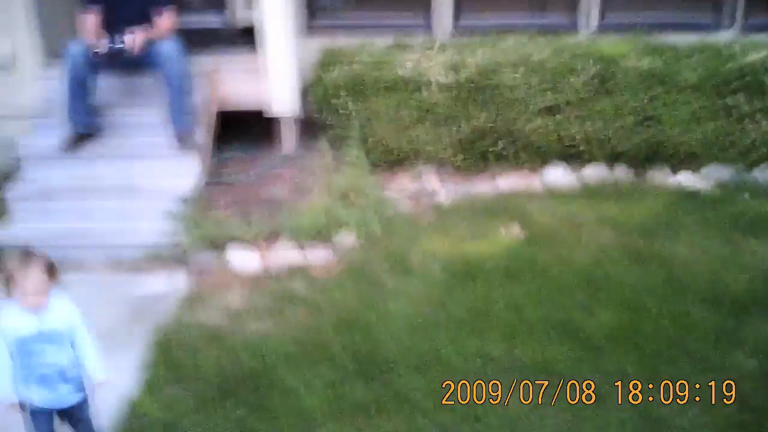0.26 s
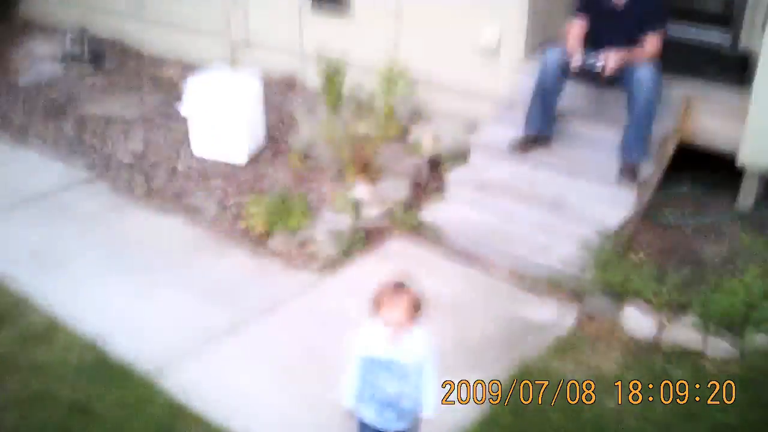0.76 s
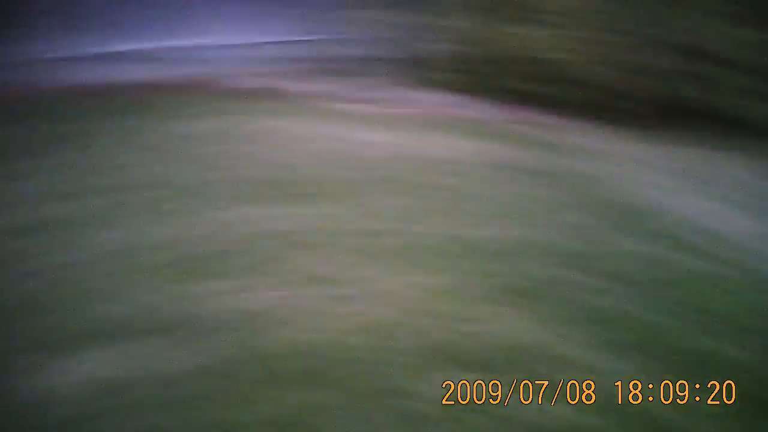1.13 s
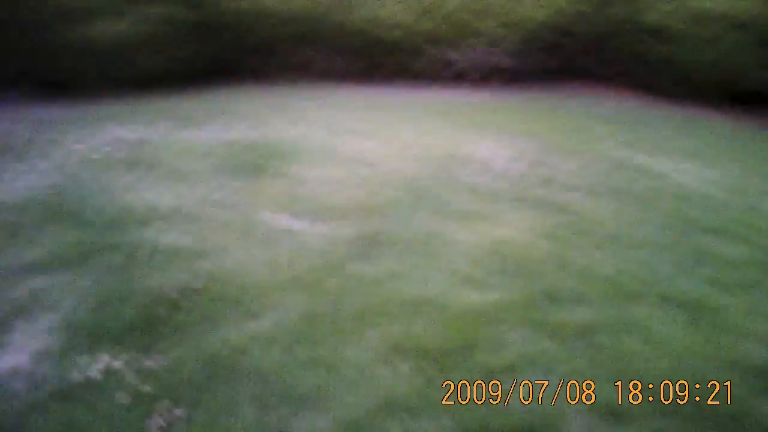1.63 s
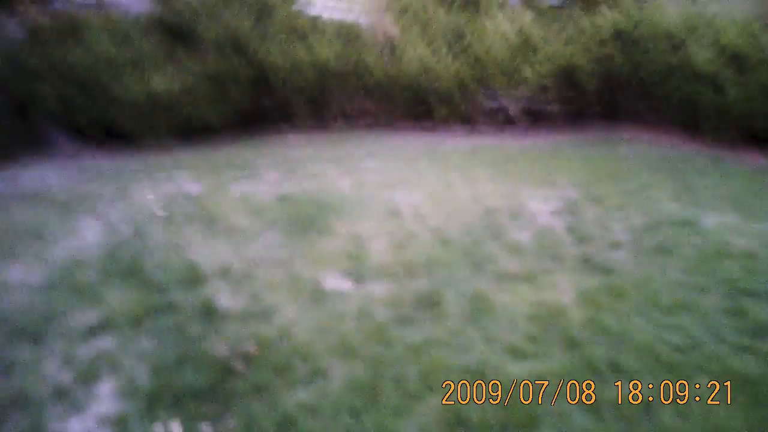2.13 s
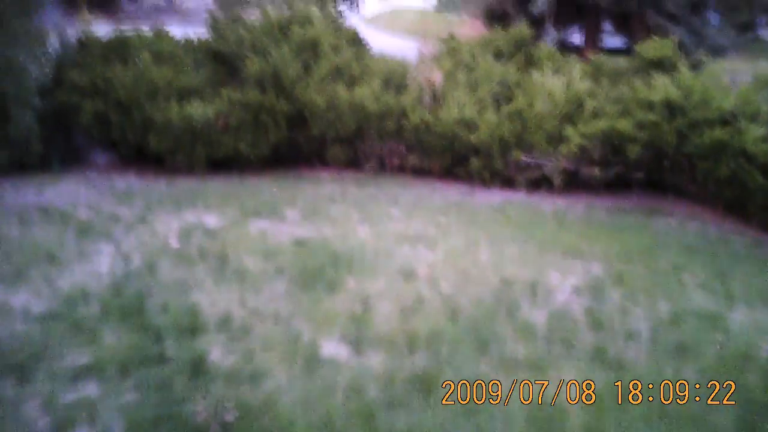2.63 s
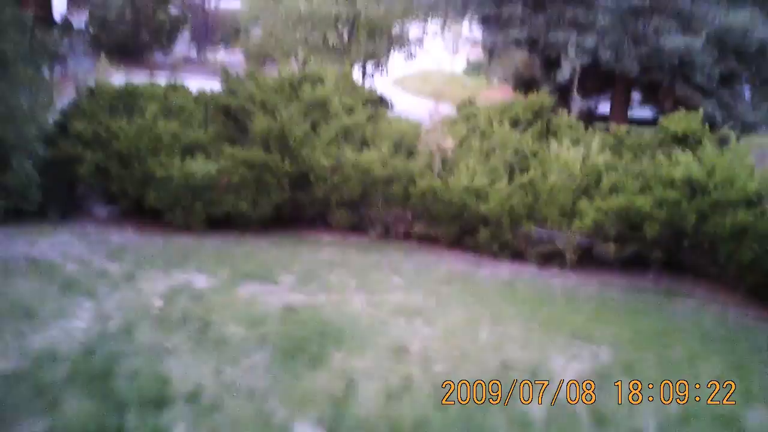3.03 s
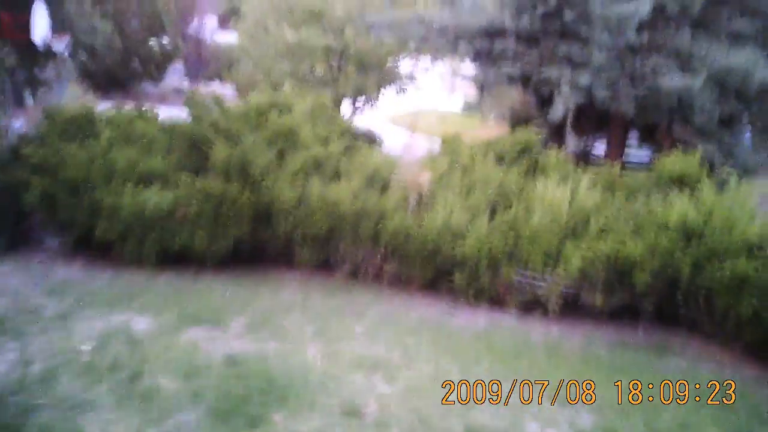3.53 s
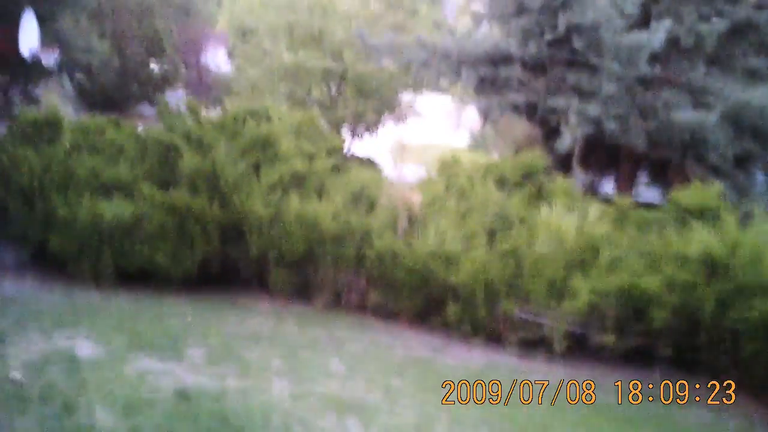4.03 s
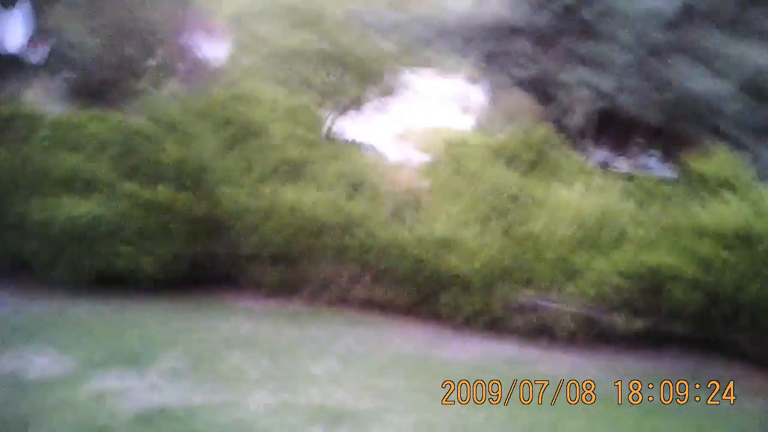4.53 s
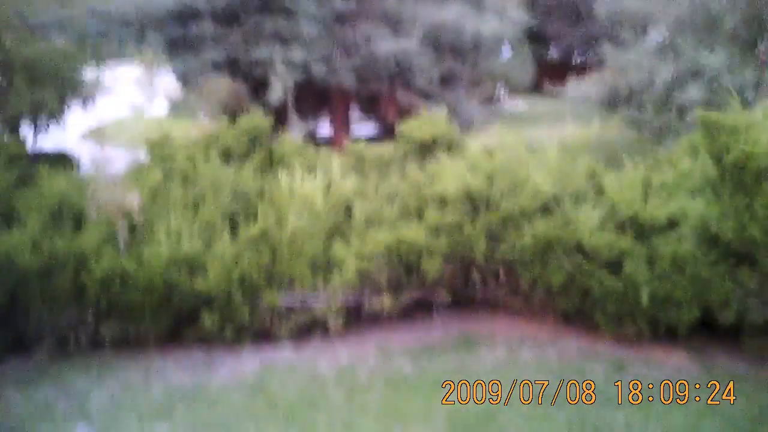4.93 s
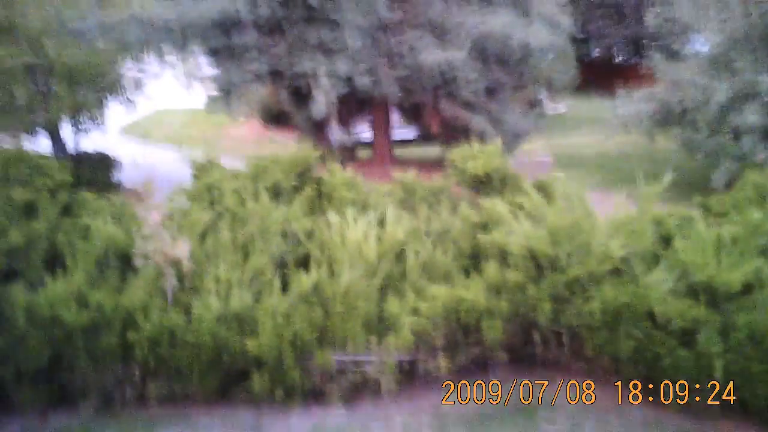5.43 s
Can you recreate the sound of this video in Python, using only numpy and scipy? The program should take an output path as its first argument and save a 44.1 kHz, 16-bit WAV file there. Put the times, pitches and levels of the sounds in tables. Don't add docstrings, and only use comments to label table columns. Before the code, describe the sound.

A microphone on a small electric helicopter catches two high gear whines beating against each other, over a rapid blade throb and hissing downwash. One whine races up near one second and rings, then both sag and buzz harshly, before speeding up again with a few air pops. Very close, dry and distorted.

```python
import sys
import numpy as np
from scipy import signal
from scipy.fft import rfft, irfft
from scipy.io import wavfile
from scipy.ndimage import uniform_filter1d

SR = 44100
rng = np.random.default_rng(int(sys.argv[2]) if len(sys.argv) > 2 else 0)


def volts_from_db(level):
    exponent = np.asarray(level, float) / 20
    return 10 ** exponent


def persist_wave(psi):
    counts = np.round(np.clip(psi, -1, 1) * 32767).astype(np.int16)
    wavfile.write(sys.argv[1], SR, np.atleast_2d(counts).T)


N = 250047
TIME_S = np.arange(N) / SR
WHEEL_TEETH, PINION_TEETH = 92, 10
CRUISE_HZ = 2500


def in_time(rows):
    s, *columns = np.transpose(rows)
    return [np.interp(TIME_S, s, column) for column in columns]


def rms_one(x):
    return x / np.sqrt(np.mean(np.abs(x) ** 2) + 1e-20)


def wander(width_hz):
    r = np.exp(-2 * np.pi * width_hz / SR)
    white = rng.standard_normal(N) + 1j * rng.standard_normal(N)
    return rms_one(signal.lfilter([1], [1, -2 * r, r * r], white))


def line(turns):
    return np.sqrt(2) * np.exp(2j * np.pi * turns)


def resonance(hz, centre_hz, width_hz):
    return 1 / (1 + (2 * (hz - centre_hz) / width_hz) ** 2)


def coloured(points, modes=()):
    hz = np.maximum(np.arange(N // 2 + 1) * SR / N, 10)
    points_hz, points_db = np.transpose(points)
    level_db = np.interp(np.log(hz), np.log(points_hz), points_db)
    for mode_hz, width_hz, bump_db in modes:
        level_db += bump_db * resonance(hz, mode_hz, width_hz)
    return rms_one(irfft(rfft(rng.standard_normal(N)) * volts_from_db(level_db), N))


# pitch in Hz, level in dB.
SWITCHING = [
    (1960.5, -41),
    (3921, -58.5),
]


def chopper():
    return sum(volts_from_db(db) * (line(hz * TIME_S) * (1 + 0.91 * wander(20.0))).real for hz, db in SWITCHING)


# centre in seconds, swell in dB, half length in seconds.
AIR_GUSTS = [
    (0.515, 5, .05),
    (0.933, 6, 0.083),
    (1.8, -4, .5),
    (2.818, 4.5, 0.04),
    (3.15, 2.5, 0.16),
    (4.2, 3.5, 0.22),
    (4.687, 6.5, 0.12),
]


def gust():
    breeze_db = -37.5
    colour = [(20, -7.5), (45, 2.5), (90, -1.5), (200, -6.5), (400, -16.0), (900, -24.0), (20000, -90)]
    swell_db = sum(db * np.exp(-((TIME_S - s) / half_s) ** 2) for s, db, half_s in AIR_GUSTS)
    flutter_db = 2.6 * wander(20.0).real
    return volts_from_db(breeze_db + swell_db + flutter_db) * coloured(colour)


# start in seconds, peak in dB.
EDDIES = [
    (4.199, -23),
    (4.348, -15.5),
    (4.679, -17),
]


def pops():
    dip_s = 0.001
    return sum(-volts_from_db(db + 3.5) * np.exp(-((TIME_S - s - dip_s) / dip_s) ** 2) for s, db in EDDIES)


# frequency in Hz, level in dB per Hz.
FRAME_COLOUR = [(180, -17), (300, -14.5), (647, -21), (1060, -13.5), (1920, -0.5), (2080, -2.5), (2450, -5),
                (3260, -12.5), (4870, -16.5), (7510, -24), (9100, -35.5), (12700, -33.5), (13800, -36)]
# frequency in Hz, width in Hz, bump in dB.
FRAME_RESONANCES = [(1475, 94, 6.5), (2094, 80, -4.5), (2350, 320, 5), (2590, 90, -11), (2853, 145, 6)]
# frequency in Hz, level in dB per Hz.
BOOM_COLOUR = [(1000, -48), (1600, -24), (1780, 6), (1900, 6.5), (2050, -3), (3000, -55)]


def roar(upper_teeth, lower_teeth, upper_hz, lower_hz):
    mean_hz = (upper_hz + lower_hz) / 2
    roar_db = -36.5 + 0.09 * (mean_hz - CRUISE_HZ) / 100
    yaw = uniform_filter1d(np.abs(np.gradient(upper_hz - lower_hz)) * SR / 1000, SR // 4)
    roar_db = roar_db + 0.88 * yaw
    boom_wakes_hz = 2580
    boom_db = -30 + 2.5 * np.maximum(lower_hz - boom_wakes_hz, 0) / 100
    boom_db = boom_db + 3 * wander(12.0).real
    upper_passing = np.cos(4 * np.pi * upper_teeth / WHEEL_TEETH)
    lower_passing = np.cos(4 * np.pi * lower_teeth / WHEEL_TEETH)
    swell = volts_from_db(1.14 * (upper_passing + lower_passing) + 1.06 * wander(9.0).real)
    frame = volts_from_db(roar_db + 6.0) * coloured(FRAME_COLOUR, FRAME_RESONANCES)
    boom = volts_from_db(boom_db - 5.0) * coloured(BOOM_COLOUR)
    return swell * (frame + boom)


MESH_MIXES = [(2, 0), (1, 1), (0, 2), (3, 0), (2, 1), (1, 2), (4, 0), (3, 2)]
# line in dB, rough skirt in dB, skirt width in Hz.
MESH_MIX_SOUND = [(-67, -51.5, 160), (-60, -51.5, 150), (-80, -46.5, 290), (-68, -55.5, 120),
                  (-56.5, -55.5, 460), (-56.5, -54.5, 390), (-90, -64, 260), (-71, -63.5, 320)]


def chatter(upper_teeth, lower_teeth, upper_whine_db, lower_whine_db, upper_hz):
    upper_db = np.clip(upper_whine_db, -40, -27) + 30
    lower_db = np.clip(lower_whine_db, -40, -27) + 30
    out = 0
    for (a, b), (line_db, skirt_db, width_hz) in zip(MESH_MIXES, MESH_MIX_SOUND):
        shape = volts_from_db(line_db) * (1 + .5 * wander(25.0)) + volts_from_db(skirt_db) * wander(width_hz)
        force_db = 0.66 * (upper_db if a > b else lower_db)
        force_db = force_db + 0.6 * (a + b - 2) * (upper_hz - CRUISE_HZ) / 100
        out = out + (volts_from_db(force_db) * shape * line(a * upper_teeth + b * lower_teeth)).real
    return out


# catches in seconds, lets go in seconds, rise in seconds, gain in dB.
LOOSE_PANEL = (2.38, 3.95, 0.048, 3.2)


def panel_db():
    catch_s, free_s, rise_s, gain_db = LOOSE_PANEL
    return gain_db * np.clip(np.minimum(TIME_S - catch_s, free_s - TIME_S) / rise_s, 0, 1)


# time in seconds, tooth mesh in Hz.
UPPER_ASKED = [(0.0, 2686.0), (0.464, 2709.0), (0.593, 2573.0), (1.052, 2480.0), (1.209, 2658.0),
               (1.384, 2669.0), (1.517, 2561.0), (1.949, 2616.0), (2.248, 2476.0), (2.585, 2246.0),
               (2.916, 2411.0), (3.351, 2446.0), (3.587, 2320.0), (3.763, 2372.0), (4.076, 2679.0),
               (5.168, 2684.0), (5.395, 2499.0), (5.67, 2531.0)]
# time in seconds, tooth mesh in Hz.
LOWER_ASKED = [(0.0, 2496.0), (0.233, 2526.0), (0.729, 2405.0), (0.95, 2842.0), (1.049, 2912.0),
               (1.316, 2369.0), (1.519, 2565.0), (1.665, 2342.0), (2.107, 2384.0), (2.653, 2178.0),
               (2.928, 2293.0), (3.334, 2304.0), (3.713, 2214.0), (4.081, 2449.0), (4.64, 2562.0),
               (5.176, 2499.0), (5.444, 2399.0), (5.67, 2427.0)]


def spin(asked):
    span = int(.07 * SR)
    once = uniform_filter1d(in_time(asked)[0], span, mode="nearest")
    return uniform_filter1d(once, span, mode="nearest")


BLADE_ORDERS = [1, 2, 3, 4, 6]
UPPER_BLADE_DB = [-14.5, -0.5, -18.5, -6.5, -16]
LOWER_BLADE_DB = [-5, 2.5, -17, -8, -14]
# time in seconds,
# upper lead in turns, lower lead in turns, upper beat in dB, lower beat in dB.
TILT = [
    (0, 0.25, 0.14, -30.5, -32),
    (1.3, 0.27, 0.15, -29.5, -42.5),
    (1.9, 0.25, 0.17, -31.5, -38.5),
    (2.35, 0.21, 0.24, -30.5, -41),
    (2.6, 0.41, 0.52, -37.5, -37),
    (2.85, 0.18, 0.33, -30, -47),
    (4.5, 0.15, 0.367, -28.5, -39.5),
    (5.1, 0.21, .365, -28.5, -37),
    (5.67, 0.2, 0.32, -29, -41),
]


def blade_beat(rotor, lead, beat_db, orders_db):
    orders = sum(volts_from_db(db) * line(k * (rotor + lead)) for k, db in zip(BLADE_ORDERS, orders_db))
    return volts_from_db(beat_db) * 1j * orders


# shaft at cruise in dB, its rise in dB per 100 Hz,
# whine gain on speeding up in dB per 1000 Hz/s, whine gain on any change in dB per 1000 Hz/s.
UPPER_FORCES = (-39.5, 0.2, 2.3, 0.3)
LOWER_FORCES = (-45.5, 3, 0.7, 1.5)
MOTOR_ORDERS = [3, 4, 5, 6, 7, 8, 9, 11]
UPPER_ORDERS_DB = [-59, -78, -62, -52, -50.5, -53, -55, -65]
LOWER_ORDERS_DB = [-65, -55, -49, -50.5, -50, -54, -41.5, -46]


def motor_shaft(teeth, mesh, motor_db, orders_db):
    shaft = volts_from_db(motor_db) * line(teeth / PINION_TEETH) * (1 + 0.45 * wander(20.0))
    blur = wander(29.0)
    for k, db in zip(MOTOR_ORDERS, orders_db):
        unsteady = 1 + 0.062 * k * np.roll(blur, k * N // PINION_TEETH)
        shaft = shaft + volts_from_db(db) * line(k * mesh / PINION_TEETH) * unsteady
    return shaft


def canopy_ring(mesh_hz, mesh, canopy_db):
    near = resonance(1.5 * mesh_hz, 3490, 300)
    return volts_from_db(canopy_db) * near * (1 + .4 * wander(15.0)) * line(1.5 * mesh)


# mesh in Hz, whine in dB.
UPPER_FRAME_PATH = [(2260, -37), (2330, -23.5), (2410, -24), (2505, -31.5), (2550, -52), (2630, -36.5),
                    (2665, -31), (2720, -26)]
LOWER_FRAME_PATH = [(2195, -20.5), (2300, -23), (2350, -25.5), (2420, -28), (2510, -33), (2550, -39),
                    (2640, -37), (2890, -30)]
UPPER_GEAR = (0.029, 0.33, 0.29, 0.037, .12)
LOWER_GEAR = (0.14, 0.24, 0.073, .065, .33)


def drive(mesh_hz, path, forces, lead, beat_db, blade_db, orders_db, wheel, spot, canopy_db, buzz_db=0):
    teeth = np.cumsum(mesh_hz) / SR
    rotor = teeth / WHEEL_TEETH
    cruise_db, slope_db, push_db, strain_db = forces
    motor_db = cruise_db + slope_db * (mesh_hz - CRUISE_HZ) / 100
    change = np.gradient(mesh_hz) * SR / 1000
    whine_db = np.interp(mesh_hz, *np.transpose(sorted(path))) + push_db * change
    whine_db = whine_db + strain_db * uniform_filter1d(np.abs(change), SR // 5) + buzz_db
    swing, depth, oval, jitter, rough = wheel
    angle = 2 * np.pi * (rotor + spot)
    mesh = teeth + swing * np.sin(angle) + jitter * (wander(35.0) + 1.2 * wander(8.8)).real
    press = 1 - depth * np.cos(angle) + oval * np.exp(2j * angle) + rough * wander(123.0)
    whine = volts_from_db(whine_db) * press * line(mesh)
    sound = blade_beat(rotor, lead, beat_db, blade_db) + motor_shaft(teeth, mesh, motor_db, orders_db)
    sound = sound + whine + canopy_ring(mesh_hz, mesh, canopy_db + buzz_db)
    return sound.real, teeth, whine_db


def scene():
    upper_lead, lower_lead, upper_beat_db, lower_beat_db = in_time(TILT)
    upper_hz, lower_hz = spin(UPPER_ASKED), spin(LOWER_ASKED)
    upper, upper_teeth, upper_db = drive(
        upper_hz, UPPER_FRAME_PATH, UPPER_FORCES, upper_lead, upper_beat_db, UPPER_BLADE_DB,
        UPPER_ORDERS_DB, UPPER_GEAR, spot=0.53, canopy_db=-62)
    lower, lower_teeth, lower_db = drive(
        lower_hz, LOWER_FRAME_PATH, LOWER_FORCES, lower_lead, lower_beat_db, LOWER_BLADE_DB,
        LOWER_ORDERS_DB, LOWER_GEAR, spot=-0.2, canopy_db=-47.0, buzz_db=panel_db())
    air = roar(upper_teeth, lower_teeth, upper_hz, lower_hz) + gust() + pops()
    gears = chatter(upper_teeth, lower_teeth, upper_db, lower_db, upper_hz)
    return (upper + lower + gears + chopper() + air)[None]


def low_pass(x):
    return signal.sosfilt(signal.butter(12, 15490, fs=SR, output="sos"), x)


def record(dry):
    overload, offset = .25, .0035
    capsule = signal.sosfilt(signal.butter(10, 13600, fs=SR, output="sos"), dry)
    overtones = signal.sosfilt(signal.butter(3, 1500, "high", fs=SR, output="sos"), capsule ** 2)
    flat = np.clip(capsule + .25 * overtones + offset, -overload, overload)
    mix = signal.sosfiltfilt(signal.butter(4, 15200, fs=SR, output="sos"), flat)
    return low_pass(mix)


dry = scene()
out = record(dry)
persist_wave(out)
```